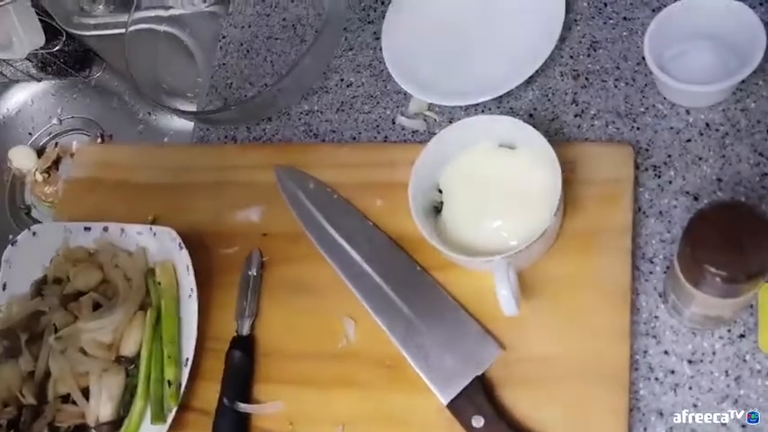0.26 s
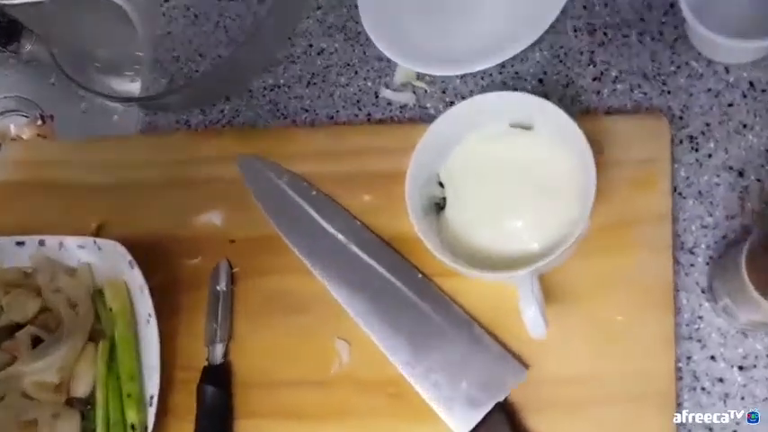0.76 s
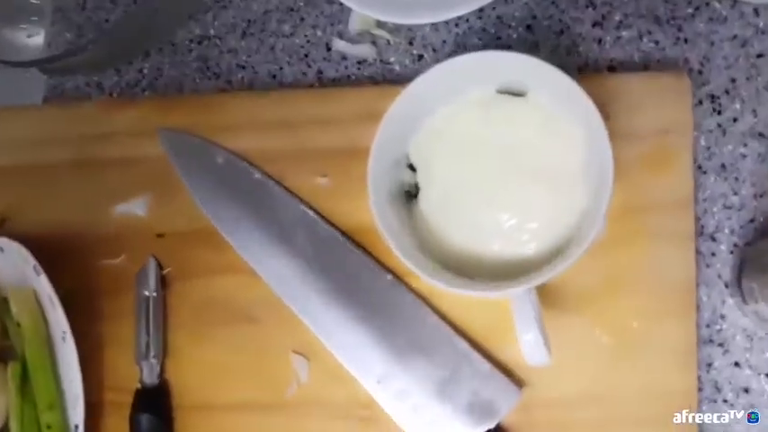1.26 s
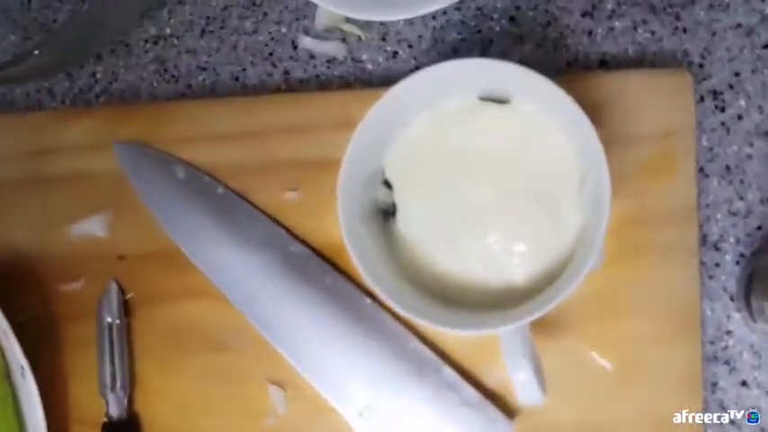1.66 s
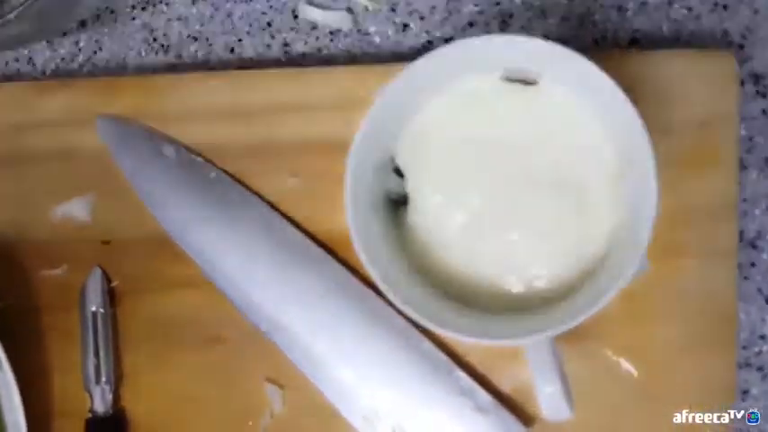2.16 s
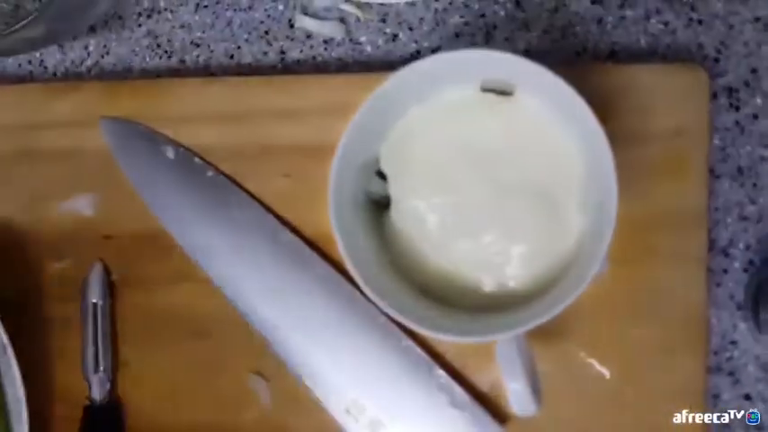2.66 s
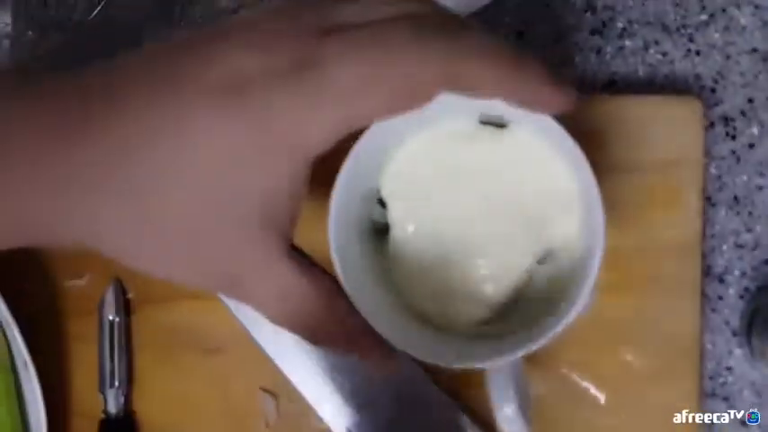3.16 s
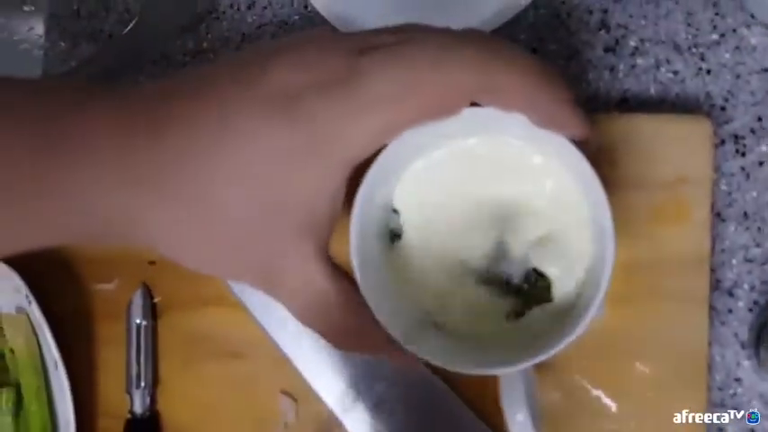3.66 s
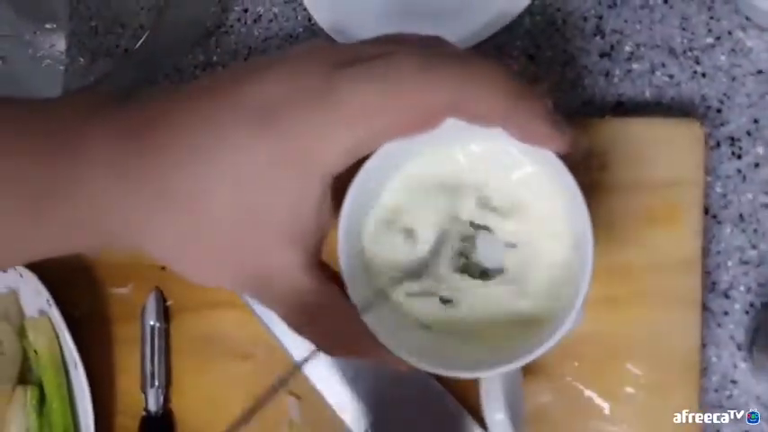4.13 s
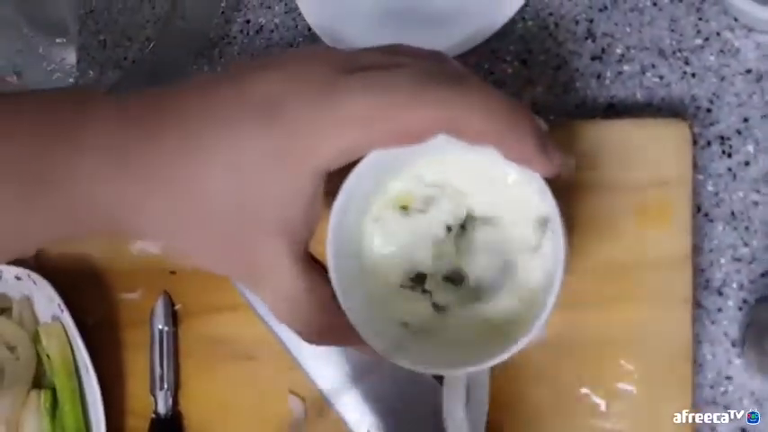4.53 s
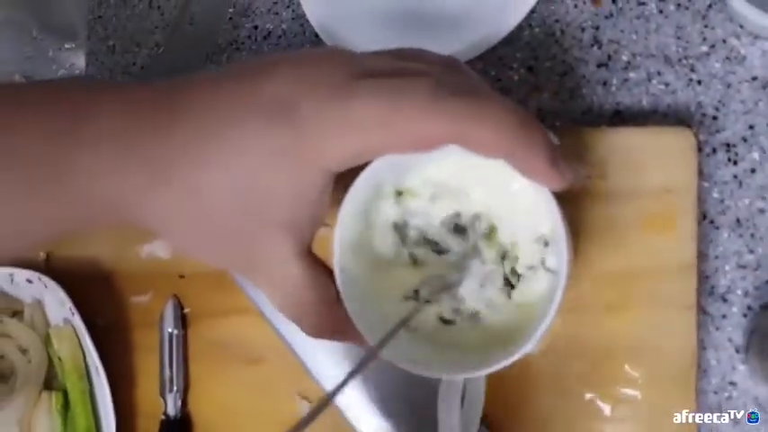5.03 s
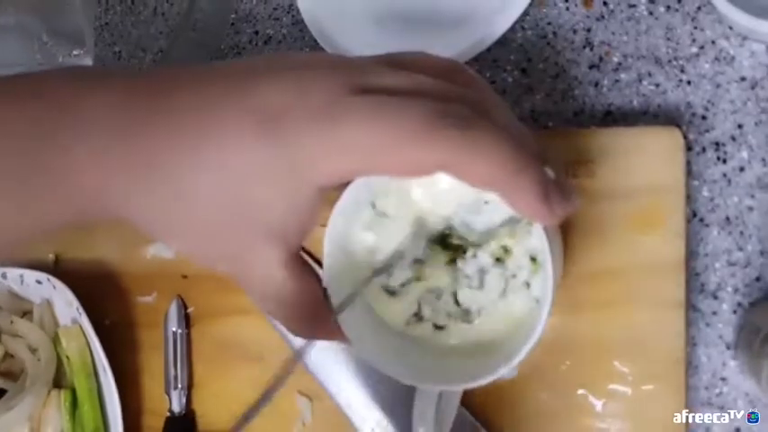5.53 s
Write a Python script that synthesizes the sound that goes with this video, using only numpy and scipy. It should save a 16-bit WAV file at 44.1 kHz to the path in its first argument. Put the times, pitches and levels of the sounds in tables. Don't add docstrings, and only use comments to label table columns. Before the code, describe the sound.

A low fridge drone and weak, fluctuating hiss lie under a small tiled kitchen. At about 0.5 s steel cutlery clashes sharply, with a short, lighter shuffle until 0.75. From 0.8 to 1.65 s the rummaging grows dense: bright, short rattles, gritty sliding scrapes, low tray thuds, and a thin high ring near 0.95. The strongest clashes come around 1.45 to 1.6, then it stops. From 1.7 to 3.3 s there is almost only hum, with faint handling near 3. At 3.33 s a spoon clinks against a sauce-filled ceramic cup, again at 3.6, then 4.15, 4.43, 4.68, 4.93, loudest at 5.15, then 5.39 and 5.65. Each knock is crisp but quickly damped, often doubled, trailed by faint squelch, glaze rub and soft wooden thuds. The microphone is close, the reverberation short, and the treble limited with compressed, patchy dropouts.

```python
import sys
import numpy as np
from scipy import signal
from scipy.fft import rfft, irfft, next_fast_len
from scipy.io import wavfile
from scipy.ndimage import uniform_filter1d, map_coordinates

SR = 44100
rng = np.random.default_rng(int(sys.argv[2]) if len(sys.argv) > 2 else 0)


def volts_from_db(level):
    exponent = np.asarray(level, float) / 20
    return 10 ** exponent


def master_out(mix):
    frames = np.transpose(np.atleast_2d(mix))
    ceiling = np.clip(frames, -1, 1)
    pcm = np.round(ceiling * 32767).astype(np.int16)
    wavfile.write(sys.argv[1], SR, pcm)


N = 255339
TIME_S = np.arange(N) / SR

STEEL_HZ = [2250, 3000, 3640, 4250, 4730, 5050, 6050, 7070, 7490, 7620, 8480, 8680, 9240]
# (time [s], level [dB], held [s], handles over blades [dB])
SLIDES = [(.497, -44, .025, -2), (0.529, -39.5, .003, 3), (.547, -34, 0.016, -1), (0.779, -37, 0.034, -8.5),
          (.836, -41, .003, -2), (0.851, -32.5, 0.016, -5.5), (0.897, -33, .01, -6.5),
          (0.911, -30, 0.02, -6.5), (.928, -31, .012, -5), (0.953, -30.5, 0.083, -5),
          (1.039, -35, 0.034, -9), (1.079, -38.5, 0.0036, -5), (1.097, -37, 0.0053, -7),
          (1.125, -38, 0.025, -2.5), (1.151, -38, 0.057, -1), (1.246, -43.5, 0.049, -10),
          (1.308, -41.5, 0.01, -7), (1.343, -50, .003, 7), (1.362, -36, 0.077, -5),
          (1.455, -34.5, 0.041, -7.5), (1.499, -32, 0.0043, -6.5), (1.513, -40.5, 0.0057, 9.5),
          (1.535, -31.5, 0.041, -4.5), (1.598, -30.5, 0.049, -6.5)]
# (time [s], squelch [dB], held [s], rub on glaze over squelch [dB])
DRAG = [(3.35, -59.5, 0.203, -1.5), (3.624, -47.5, .003, -6), (4.172, -45, 0.0045, -4),
        (4.218, -62.5, 0.0044, 5), (4.447, -52.5, 0.0025, -4), (4.505, -75, 0.0032, 11),
        (4.691, -50, 0.023, -5.5), (4.773, -60.5, 0.0044, -5), (4.952, -46, .004, -6.5),
        (5.169, -43, .004, 0.2), (5.402, -50.5, 0.00295, 5.5), (5.422, -48.5, 0.017, -6.5),
        (5.67, -43, 0.0021, 0)]
# (last 20 dB of rise [s], sag while held [dB/s], release [dB/s],
#                 tail under peak [dB], tail fade [dB/s])
TRAY_SHAPE = (0.0082, 110, 370, 20.7, 230)
DRAG_SHAPE = (0.0099, 25, 500, 15, 118)


def unit(x):
    return x / np.sqrt(np.mean(x ** 2) + 1e-20)


def peak(x):
    return x / np.max(np.abs(x))


def along(points, hz):
    f, v = np.transpose(points)
    return np.interp(np.log(hz + 1), np.log(f + 1), v)


def wobble(rate_hz):
    knots = rng.standard_normal(int(N * rate_hz / SR) + 4)
    return map_coordinates(knots, [np.arange(N) * rate_hz / SR])


def filtered(x, response):
    m = next_fast_len(len(x) + min(8192, len(x) // 3))
    return irfft(rfft(x, m) * response(np.fft.rfftfreq(m, 1 / SR)), m)[:len(x)]


def coloured(spectrum, grain_db=0):
    contacts = rng.standard_normal(N) * volts_from_db(grain_db * wobble(900))
    return unit(filtered(contacts, lambda hz: volts_from_db(along(spectrum, hz))))


def patchy(x, depth_db):
    z = signal.stft(x, nperseg=256)[2]
    field = uniform_filter1d(rng.standard_normal(z.shape), size=4, axis=0)
    field = uniform_filter1d(field, size=6, axis=1)
    return unit(signal.istft(z * volts_from_db(depth_db * unit(field)), nperseg=256)[1][:N])


def modes(table):
    def response(f):
        total = 0
        for k, (hz, width, db) in enumerate(table):
            damping = 1j * f * width
            total = total + (-1) ** k * volts_from_db(db) * damping / (hz * hz - f * f + damping)
        return total
    return response


def struck(blow, table, edges_hz, peaks_db):
    total = 0
    for lo, hi, db in zip(edges_hz, edges_hz[1:], peaks_db):
        group = [(hz, width, level + rng.normal(0, 1.2)) for hz, width, level in table if lo < hz < hi]
        total = total + volts_from_db(db) * peak(filtered(blow, modes(group)))
    return total


def strokes(rows, shape, extra_db=0):
    rise_s, sag, release, tail_db, fade = shape
    s, db, held = np.transpose(rows)[:3, :, None]
    clock = np.arange(0, N / SR + .002, .001)
    u = clock - s
    body_db = -sag * np.minimum(u, held) - release * np.maximum(u - held, 0)
    shape_db = np.where(u < 0, -20 * (u / rise_s) ** 2, np.maximum(body_db, -tail_db - fade * u))
    level_db = db + np.reshape(extra_db, (-1, 1)) + shape_db
    return np.interp(TIME_S, clock, np.sqrt(np.sum(volts_from_db(level_db) ** 2, axis=0)))


def add(track, s, sound):
    part = track[round(s * SR):][:len(sound)]
    part += sound[:len(part)]


def roomy(sound, wet_db):
    # (frequency [Hz], t60 [s])
    decay = [(300, 0.8), (1500, 0.095), (5000, 0.19), (10000, 0.095)]
    hz, t, z = signal.stft(rng.standard_normal(SR // 4), SR, nperseg=256)
    tail = signal.istft(z * volts_from_db(-60 * t / along(decay, hz)[:, None]), SR, nperseg=256)[1]
    late = np.pad(sound, (round(0.0027 * SR), 0))
    wet = volts_from_db(wet_db) * signal.fftconvolve(late, tail / np.linalg.norm(tail))
    add(wet, 0, sound)
    return wet


def effort():
    spoon_load_db, smooth_s = 9.5, 0.058
    work = strokes(SLIDES, TRAY_SHAPE) ** 2 + (volts_from_db(spoon_load_db) * strokes(DRAG, DRAG_SHAPE)) ** 2
    return np.sqrt(np.abs(uniform_filter1d(work, round(smooth_s * SR))))


def kitchen():
    # (frequency [Hz], density [dB/Hz])
    drone_spectrum = [(12, -52.5), (20, -24.5), (43, -6.5), (97, -0.5), (129, -4), (165, -18), (206, -2),
                      (226, -10.5), (239, -3), (248, -19), (285, -9.5), (302, -42), (320, -36), (420, -54),
                      (700, -120)]
    # (frequency [Hz], density [dB/Hz])
    air_spectrum = [(150, -40.5), (250, -4.5), (398, 4), (763, -24.5), (899, -22), (1200, -34.5),
                    (1560, -75.5), (2640, -120)]
    # (frequency [Hz], density [dB/Hz])
    hiss_spectrum = [(290, -41.5), (500, -10), (763, -8), (897, -16), (1340, -17), (1890, -13.5),
                     (2520, -10), (2850, -16.5), (4580, -10.5), (5380, -15.5), (9770, -14.5), (12700, -49),
                     (21500, -120)]
    # (time [s], level [dB])
    gate_points = [(0.0, -69.5), (.3, -71.5), (.48, -86), (1.9, -83.5), (1.95, -77), (2.3, -75.5),
                   (2.6, -85), (2.84, -85), (2.91, -73), (3.4, -67), (3.65, -84.5), (4.1, -66),
                   (4.52, -76.5), (4.72, -81.5), (4.85, -72), (5.35, -72), (5.46, -78), (5.79, -88.5)]
    drone_db, drone_gate_share, shake_db = -59, 0.33, -17.5
    air_db, draft_db, draft_fade_db_s, stirred_db = -78, -65, 12, -29.5
    gate_s, gate_db = np.transpose(gate_points)
    gate, work = volts_from_db(np.interp(TIME_S, gate_s, gate_db)), effort()
    drone = np.hypot(volts_from_db(drone_db) * (gate / gate.mean()) ** drone_gate_share, volts_from_db(shake_db) * work)
    hum = drone * volts_from_db(1.5 * wobble(6)) * volts_from_db(-0.5) * coloured(drone_spectrum)
    phase = 2 * np.pi * 222 * TIME_S + 1.1 * wobble(16)
    compressor = volts_from_db(-64 + 2.5 * wobble(15)) * np.sin(phase)
    air_gain = volts_from_db(air_db) + volts_from_db(draft_db - draft_fade_db_s * TIME_S) + volts_from_db(stirred_db) * work
    air = air_gain * volts_from_db(0.82 * wobble(9.4) - 0.4) * coloured(air_spectrum)
    hiss = gate * volts_from_db(5.0) * patchy(coloured(hiss_spectrum), depth_db=1.5)
    return hum + compressor + air + hiss


def steel_modes():
    # (level [dB], t60 [s])
    steel_levels = [(-6, 0.042), (-6, 0.045), (-12, 0.063), (-2.5, 0.027), (0.5, 0.035), (-0.5, 0.023),
                    (-10, 0.027), (-19, 0.02), (4, 0.04), (2.5, 0.053), (-0.5, 0.02003), (-5, 0.012),
                    (-29, 0.078)]
    return [(hz, np.log(1000) / (np.pi * t60), db) for hz, (db, t60) in zip(STEEL_HZ, steel_levels)]


def clashes():
    # (time [s], tip modes peak [dB], low modes [dB], middle modes [dB], blade mode [dB])
    clash_rows = [(0.4902, -29, -16, -12, -4), (0.4966, -32, -10, -7.5, 0.5), (0.529, -26.5, -14, 0.5, 3),
                  (0.5442, -19, -17.5, -7.5, -11.5), (0.7732, -35.5, -10, -9.5, -7),
                  (0.842, -26, -6, 1, -25), (0.892, -31, -4, -1.5, -14), (0.9436, -32, -13, 8, -10),
                  (1.0315, -33, -4, 7.5, -9.5), (1.086, -35, 1, -11, -24), (1.121, -34, 4, -12.5, -9),
                  (1.2381, -43.5, -2.5, -2.5, -6), (1.302, -32.5, -11.5, -11, -6),
                  (1.3493, -26, -14.5, 4.5, -6), (1.4425, -16, -23, -7.5, -17),
                  (1.5184, -20, -12.5, 5, 12.5), (1.5888, -19.5, -4, -3, -0.5), (1.494, -29, 3.5, -2, -3.5),
                  (0.7782, -36, -7, -5, -6), (0.9069, -39, 2, 7, -4), (1.052, -40, -1, 3, 8),
                  (1.255, -48, 4, 8, -2), (1.092, -36.5, -1, 0.5, -6)]
    # (blade [Hz], upper middle modes [dB], rattle rise [s], rattle t60 [s])
    contact_rows = [(7660, -15, .002, 0.018), (7530, -12, .001, .025), (7440, -2, .001, 0.018),
                    (7700, -10, .005, .045), (7530, -9, .002, .02), (7500, -2.5, .001, .016),
                    (7540, -4, .002, .02), (7500, 7, .003, .03), (7500, -2, 0.00092, 0.0094),
                    (7500, -10, .002, 0.022), (7500, -12, .001, .02), (7770, -5, .001, .02),
                    (7600, -11, .0015, .02), (7500, -1.5, 0.0012, .02), (7500, -14, .001, .014),
                    (7503, -4.5, .0015, .018), (7610, -8, 0.0026, .045), (7600, -3, .0007, .025),
                    (7500, -8, .002, .02), (7500, -3, .001, .016), (7450, -8, .002, .016),
                    (7500, -2, .002, .02), (7400, -9, .002, .02)]
    edges_hz = [1200, 3300, 5500, 6800, 7950, 10500]
    ring_share = 0.83
    steel = steel_modes()
    blunt = [(hz, 900, 0) for hz in STEEL_HZ]
    out, t = np.zeros(N), np.arange(SR // 8) / SR
    for (s, db, low_db, middle_db, blade_db), contact in zip(clash_rows, contact_rows):
        blade_hz, upper_db, rise_s, t60 = contact
        rattle = rng.standard_normal(len(t)) * volts_from_db(-60 * t / t60) * (1 - np.exp(-t / rise_s))
        peaks_db = [db + low_db + 0.069, db + middle_db + 0.11, db + upper_db, db + blade_db + .1, db + .1]
        free = steel[:8] + [(blade_hz, *steel[8][1:])] + steel[10:]
        ring = struck(rattle, free, edges_hz, peaks_db)
        crack = struck(rattle, blunt, edges_hz, peaks_db)
        add(out, s, roomy(ring_share * ring + (1 - ring_share) * crack, wet_db=-10.5))
    return out


def sliding():
    # (frequency [Hz], density [dB/Hz])
    scrape_spectrum = [(1760, -37.5), (3000, -5.5), (4350, 0), (4870, -1.5), (6550, -0.5), (8940, -1),
                       (9580, -7.5), (9770, -23), (12700, -47.5), (21500, -120)]
    # (frequency [Hz], density [dB/Hz])
    handle_spectrum = [(710, -33), (1200, -8.5), (1310, -12.5), (1830, 1.5), (1970, -1.5), (3500, -2.5),
                       (4550, -35.5), (7700, -120)]
    # (frequency [Hz], density [dB/Hz])
    tray_spectrum = [(180, -37.5), (300, -11.5), (474, -5), (691, 1.5), (1000, -10), (1500, -15),
                     (1950, -36.5), (3300, -120)]
    # (time [s], level [dB], held [s], handles over blades [dB])
    settle_rows = [
        (.59, -53.5, 0.39, -6.5),
        (1.672, -55, 0.06, -3.5),
    ]
    slide_shape = (0.011, 150, 550, 36, 200)
    settle_shape = (.02, 154, 390, 40, 300)
    settling = strokes(settle_rows, settle_shape)
    blade_gain = strokes(SLIDES, slide_shape) + settling
    handle_gain = strokes(SLIDES, slide_shape, np.transpose(SLIDES)[-1])
    handle_gain += strokes(settle_rows, settle_shape, np.transpose(settle_rows)[-1])
    tray_gain = volts_from_db(-13) * (strokes(SLIDES, TRAY_SHAPE) + volts_from_db(0.5) * settling)
    blades = blade_gain * patchy(coloured(scrape_spectrum, grain_db=3.5), depth_db=1.8)
    handles = handle_gain * patchy(coloured(handle_spectrum, grain_db=2.5), depth_db=2.2)
    rub = volts_from_db(1.8 * wobble(140)) * (blades + handles)
    ring = filtered(rub, modes(steel_modes()))
    rumble = patchy(coloured(tray_spectrum, grain_db=0.5), depth_db=1.5)
    tray = tray_gain * volts_from_db(2.5 * wobble(30) - 2.5) * rumble
    return volts_from_db(-3.0) * rub + volts_from_db(0.5) * ring + tray


def thuds():
    # (time [s], peak [dB], pitch [Hz])
    thud_rows = [(0.553, -48, 137), (0.919, -37.5, 130), (1, -51, 148), (1.149, -40.5, 160.5),
                 (1.512, -37, 99.3), (1.609, -37.5, 220.4), (1.66, -34, 108.1), (3.613, -39.5, 204.2),
                 (4.159, -51, 145), (4.207, -42.5, 141.5), (4.228, -42, 166), (4.205, -47, 62),
                 (5.166, -47.5, 70.2), (5.33, -45.5, 85), (5.7, -52, 118), (4.433, -43, 137),
                 (4.678, -46.5, 152.4), (4.709, -45, 107.4), (4.94, -48, 147), (5.158, -38, 135),
                 (5.256, -43, 138.3), (5.662, -53.5, 151), (5.741, -42.5, 160)]
    out, t = np.zeros(N), np.arange(SR // 5) / SR
    for s, db, hz in thud_rows:
        phase = 2 * np.pi * hz * t * (1 - 0.38 * t)
        swell = volts_from_db(db + 2.0 - 60 * t / .15) * (1 - np.exp(-t / 0.0038))
        overtone = volts_from_db(-6.5 - 60 * t / 0.033) * np.sin(2.7 * phase)
        add(out, s, swell * (np.sin(phase) + overtone))
    return out


def tines():
    # (time [s], level rms [dB], held [s])
    tine_rows = [
        (.795, -53, 0.0041),
        (.862, -39.5, .012),
        (.96, -34.5, 0.046),
    ]
    tine_shape = (0.027, 260, 900, 40, 900)
    phase = 2 * np.pi * STEEL_HZ[-1] * TIME_S + 1.5 * wobble(52)
    return strokes(tine_rows, tine_shape) * np.sqrt(2) * np.sin(phase)


def stirring():
    # (frequency [Hz], density [dB/Hz])
    sauce_spectrum = [(290, -55), (500, -9.5), (710, -7), (983, -9), (1610, -4.5), (2010, -8.5),
                      (3500, -14.5), (4550, -35.5), (7700, -120)]
    # (frequency [Hz], density [dB/Hz])
    glaze_spectrum = [(2500, -30), (3300, -10), (4300, -1), (5400, -5.5), (6300, 1), (7200, -10.5),
                      (8500, -5), (9800, -11.5), (12000, -120)]
    # (frequency [Hz], density [dB/Hz])
    hand_spectrum = [(290, -31), (500, -8), (700, -11), (792, 4), (1020, -14.5), (1300, -17), (1690, -31),
                     (2860, -120)]
    # (time [s], level [dB], held [s])
    grip_rows = [(1.93, -75.5, 0.37), (2.44, -75.5, 0.18), (2.9, -66, .2), (3.05, -82, .1),
                 (3.14, -64.5, 0.048), (3.19, -61.5, 0.095), (3.35, -56.5, .004), (3.424, -55.5, .004),
                 (3.75, -81.5, 0.11), (4.058, -81, .02), (4.185, -55.5, 0.029)]
    sweep_rows = [
        (3.411, -66, 0.045, -30),
        (3.592, -56.5, 0.012, 1.5),
        (4.643, -70.5, .003, 1),
        (4.9, -73, .01, 14),
        (5.357, -69, 0.022, 4),
    ]
    grip_shape = (0.021, 46, 420, 20, 100)
    sweep_shape = (0.036, 30, 630, 30, 340)
    squelch = strokes(DRAG, DRAG_SHAPE) + strokes(sweep_rows, sweep_shape)
    rub_gain = strokes(DRAG, DRAG_SHAPE, np.transpose(DRAG)[-1])
    rub_gain += strokes(sweep_rows, sweep_shape, np.transpose(sweep_rows)[-1])
    clumps = volts_from_db(1.5 * wobble(60) - 3.5)
    sauce = squelch * clumps * patchy(coloured(sauce_spectrum, grain_db=0.0), depth_db=-1)
    hand = strokes(grip_rows, grip_shape) * volts_from_db(-1.0) * coloured(hand_spectrum, grain_db=1.5)
    glaze = patchy(coloured(glaze_spectrum, grain_db=3.0), depth_db=2.5)
    return sauce + hand + rub_gain * volts_from_db(2.2 * wobble(44) - 1.5) * glaze


def knocks():
    # (time [s], peak [dB], bowl tone [dB], floor tone [dB], wall [dB])
    knock_rows = [(3.3341, -28.5, -12, -12, -6), (3.554, -46, -9, -11, -25), (3.606, -29, -8, -6, 4.5),
                  (4.1541, -24, -11, -18.5, -11.5), (4.4303, -29.5, -8.5, -20, -9),
                  (4.5046, -46, -28, -28, -17), (4.6749, -24.5, -7, -23, -10), (4.907, -44.5, -1, -7, 7.5),
                  (4.9305, -31, -6, -5.5, 4.5), (5.1307, -57, -20.5, -21.5, -7),
                  (5.1521, -17.5, -13, -20, 1.5), (5.367, -39.5, -7.5, -11, -4),
                  (5.3868, -26, -11.5, -12.5, 4), (5.653, -25, .5, -13, -10), (4.163, -34, -11, -19, -9),
                  (4.439, -41, -6.5, -18, -10), (4.683, -36, -4, -18, -8), (4.954, -47.5, 1, -7, -3),
                  (5.159, -28.5, -11.5, -18.5, -3), (3.636, -49, -20, -25, -12), (4.217, -54, -25, -25, -8),
                  (5.424, -50, -3, -12, -6), (4.715, -52, 1.5, -14, -8)]
    # (upper wall [dB], upper rim [dB], edge [dB], chatter t60 [s], pitch ratio under sauce [1])
    landing_rows = [(-11, 3.5, -8.5, 0.017, 1.03), (-25, 2, -25, .03, 1.01), (4.5, -2.5, 0.5, 0.042, 1.01),
                    (-7.5, -3, -14, 0.043, 1.007), (-9.5, -6, -15.5, 0.044, 1.01), (-11, 3, -7, 0.026, 1.2),
                    (-3.5, -1, -23, 0.036, 1.02), (4, -2, 0, 0.038, 1.025), (-3.5, 1.5, -4.5, .036, 1.01),
                    (-6, 2, 7, .03, 0.93), (-4, 1.5, -8.5, 0.029, 1.009), (-5, -2, 3, .025, 1.01),
                    (5, -5, -2.5, 0.031, 1.01), (-8, -2, -10, 0.037, 1.02), (-8, -1, -16, .03, 1),
                    (-7, -1, -14, .03, 1.1), (-5, 1, -19, 0.025, 1.02), (-6, -3, -10, .02, 1),
                    (-2.5, 1.5, -13, 0.026, 1.01), (-6, 3, -10, .015, 1.01), (-2, .2, 1.5, .015, 1.01),
                    (-4, -3, -8, .015, 1.01), (-6, -4, -12, .015, 1.01)]
    # (frequency [Hz], width [Hz], level [dB])
    cup_modes = [(820, 810, -10), (1290, 150, 2.5), (1557, 226, -1), (2200, 250, 0.5), (2720, 760, 1.5),
                 (3570, 480, 1), (4020, 390, -4), (4530, 270, 4.5), (5240, 380, -16), (5605, 330, 6),
                 (5960, 210, 2.5), (6430, 350, 3), (7540, 430, -4.5), (8190, 520, -3), (9110, 400, -2.5),
                 (8810, 240, -1.5)]
    edges_hz = [0, 1000, 1950, 3100, 4300, 5000, 5800, 7100, 10500]
    belly_db = 2.5
    out, t = np.zeros(N), np.arange(SR // 10) / SR
    since = t - .002
    blunt = [(hz, 0.17 * hz, 0) for hz, _, _ in cup_modes]
    for (s, db, bowl_db, floor_db, wall_db), landing in zip(knock_rows, landing_rows):
        upper_db, rim_db, edge_db, t60, ratio = landing
        loaded = [(hz * ratio, width, level) for hz, width, level in cup_modes]
        swell = np.where(since < 0, volts_from_db(-20 + 16000 * since), volts_from_db(-60 * since / t60))
        blow = .11 * rng.standard_normal(len(t)) * swell
        blow[np.argmax(since > 0)] += 1
        chatter = rng.standard_normal(len(t)) * swell ** 1.36
        peaks_db = db + np.array([(bowl_db + floor_db) / 2 + belly_db, bowl_db + 3.0, floor_db + 11.0,
                                  wall_db - 2.0, upper_db, -1.5, rim_db - 3.0, edge_db])
        ring = struck(blow, loaded, edges_hz, peaks_db)
        crack = volts_from_db(-9.5) * struck(chatter, blunt, edges_hz, peaks_db)
        add(out, s - .001, roomy(ring + crack, wet_db=-11.5))
    return out


def squeaks():
    # (time [s], level [dB], held [s], frequency [Hz], width [Hz])
    squeak_rows = [(3.36, -62, 0.037, 1560, 250), (3.412, -54.5, 0.019, 1270, 600),
                   (3.49, -68, .045, 2420, 200), (3.45, -66, .025, 1900, 700), (3.44, -62, .1, 6300, 900),
                   (3.556, -60, .045, 1520, 300), (3.575, -62, .025, 6500, 600),
                   (4.636, -72, .015, 1400, 700), (4.774, -64, .008, 1330, 300),
                   (5.415, -52.5, .035, 1600, 500), (5.415, -54.5, .03, 2500, 600),
                   (4.218, -57.5, 0.017, 700, 500), (5.19, -55.5, .02, 1300, 700)]
    squeak_shape = (.012, 35, 550, 30, 300)
    out, span, lead_s = np.zeros(N), SR // 4, .03
    for s, db, held, hz, width in squeak_rows:
        ring = modes([(hz, width, 0)])
        noise = unit(filtered(rng.standard_normal(span), lambda f: ring(f) ** 2))
        add(out, s - lead_s, noise * strokes([(lead_s, db, held)], squeak_shape)[:span])
    return out * volts_from_db(2.1 * wobble(50))


def scene():
    cutlery = clashes() + sliding() + tines()
    cup = stirring() + knocks() + squeaks()
    return (kitchen() + cutlery + thuds() + cup)[None]


def tiles(shape, high, long):
    coarse = rng.standard_normal((shape[0] // high + 1, shape[1] // long + 1))
    return np.kron(coarse, np.ones((high, long)))[:shape[0], :shape[1]]


def starved(x, rarity, depth_db):
    hz, t, z = signal.stft(x, SR, nperseg=512)
    high = hz > 1300
    treble = np.linalg.norm(z[high], axis=0)
    hollow = .7 * (np.abs(hz - 3200) < 450)[:, None]
    threshold = rarity + .3 - hollow + .6 * (treble < volts_from_db(-76))
    stripes = (tiles(z.shape, high=2, long=10) > threshold) & (treble < volts_from_db(-36))
    return signal.istft(z * volts_from_db(depth_db * (stripes & high[:, None])), SR, nperseg=512)[1][:N]


def chopped(x, depth_db):
    frame_samples, frame_offset = 1024, .7
    hz, t, z = signal.stft(x, SR, nperseg=256, noverlap=192)
    level = uniform_filter1d(np.abs(z), size=5, axis=0)
    treble = np.linalg.norm(z[hz > 1300], axis=0)
    frame = np.floor(t * SR / frame_samples + 1 - frame_offset).astype(int)
    blow = np.bincount(frame, treble > volts_from_db(10) * np.roll(treble, 4)) > 1
    between = np.roll(blow, 1) & np.roll(blow, -1) & ~blow
    starts = np.flatnonzero(np.diff(frame, prepend=-1))
    top = np.maximum.reduceat(level, starts, axis=1)[:, frame]
    weak = blow[frame] & (level < volts_from_db(-9) * top) | between[frame]
    empty = weak & (tiles(z.shape, high=4, long=6) > .15) & (hz[:, None] > 1700)
    return signal.istft(z * volts_from_db(depth_db * empty), SR, nperseg=256, noverlap=192)[1][:N]


def low_pass(x):
    return signal.sosfilt(signal.butter(12, 9920, fs=SR, output="sos"), x)


def record(dry):
    top_hz = 9720
    band = filtered(dry[0], lambda hz: 1 / (1 + (hz / top_hz) ** 150))
    thin = chopped(starved(band, rarity=1.2, depth_db=-26), depth_db=-26)
    return low_pass(thin[None])


dry = scene()
out = record(dry)
master_out(out)
```